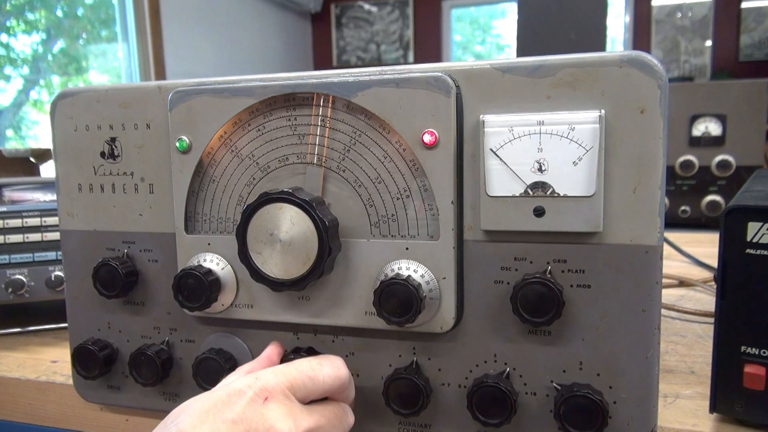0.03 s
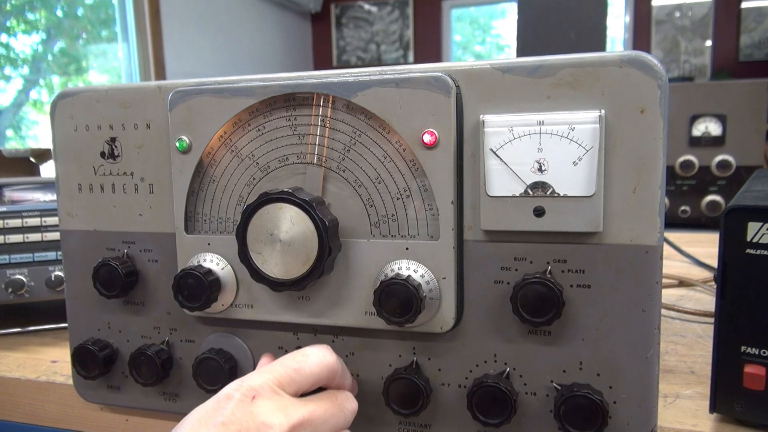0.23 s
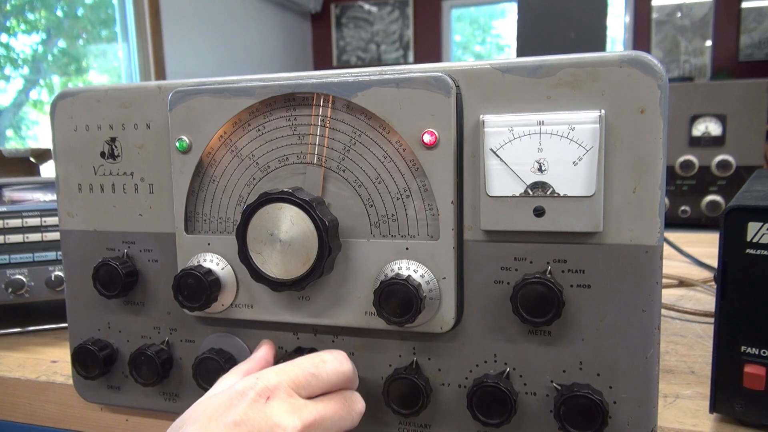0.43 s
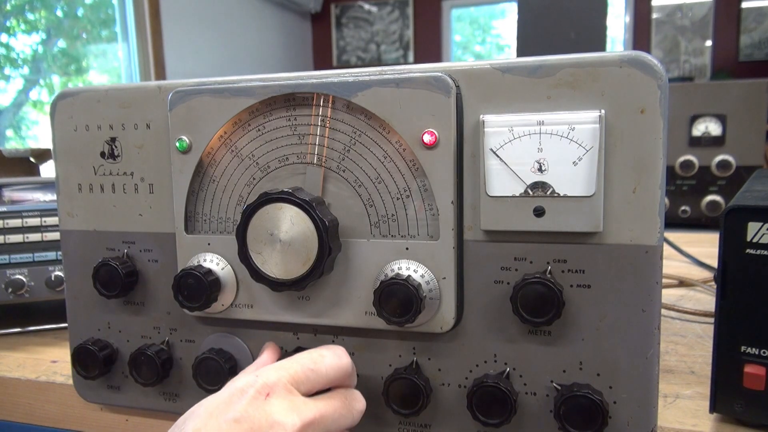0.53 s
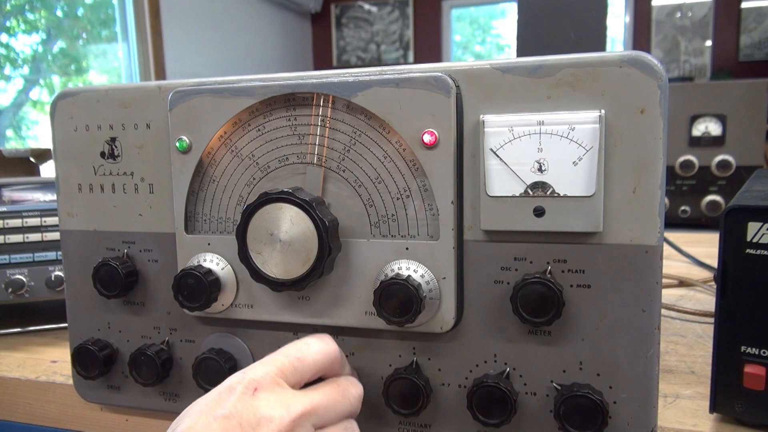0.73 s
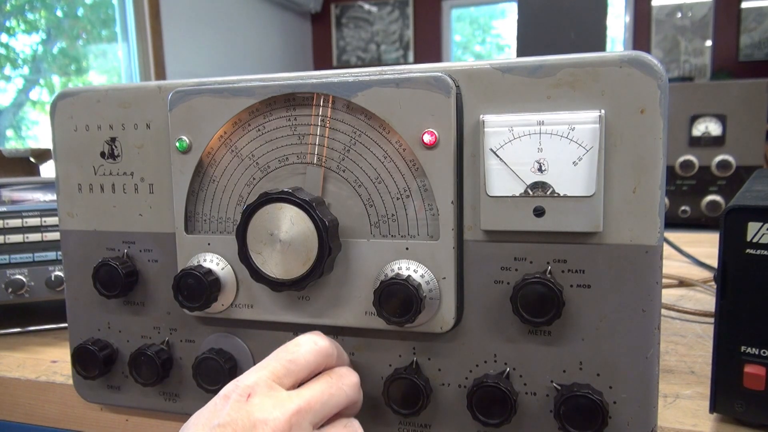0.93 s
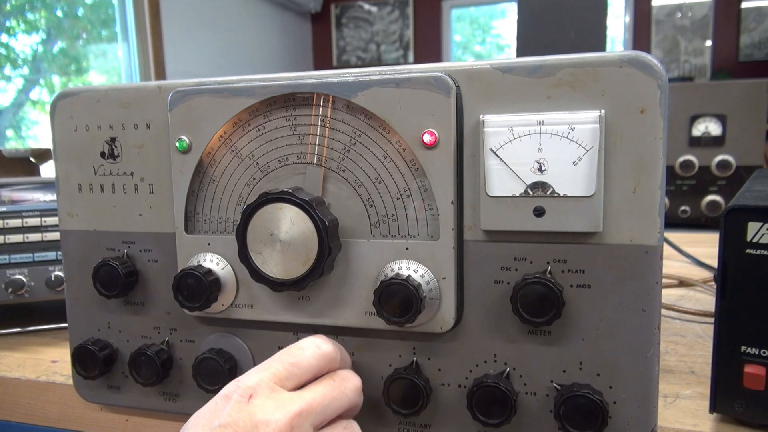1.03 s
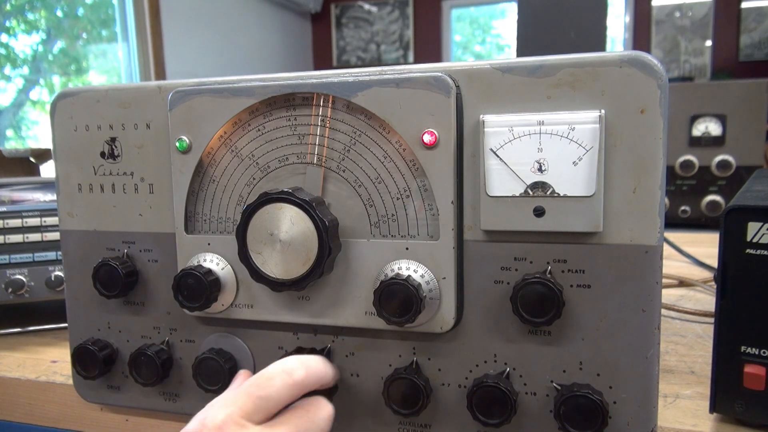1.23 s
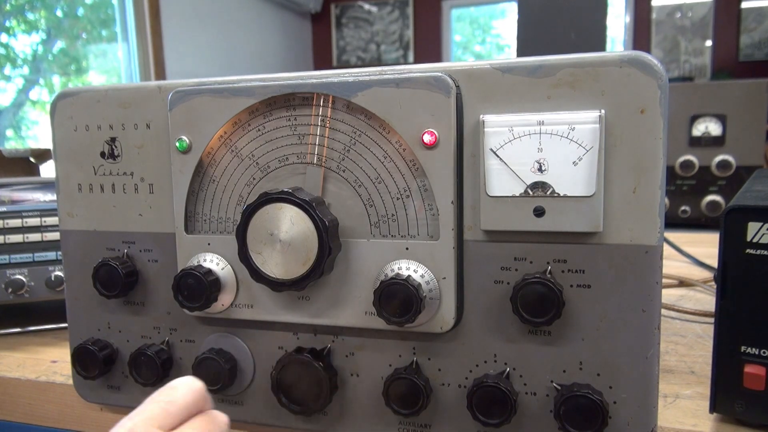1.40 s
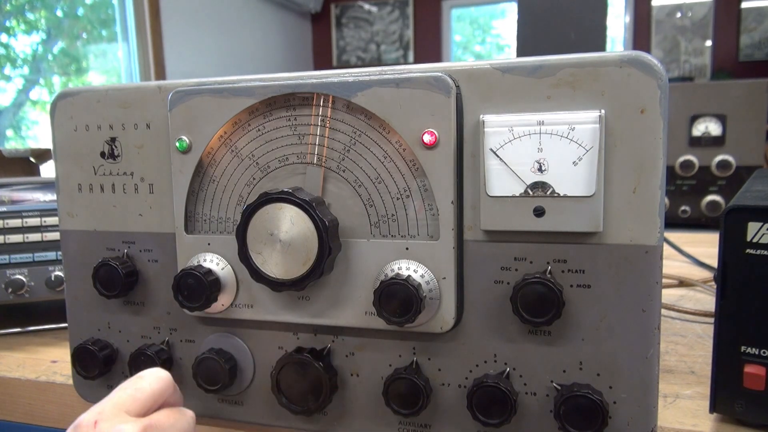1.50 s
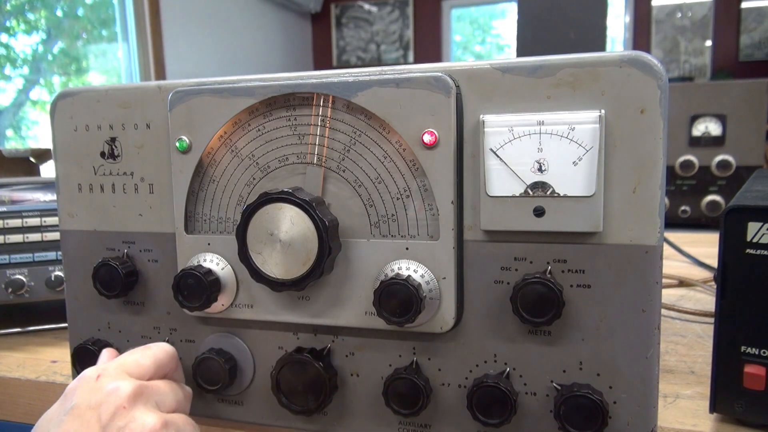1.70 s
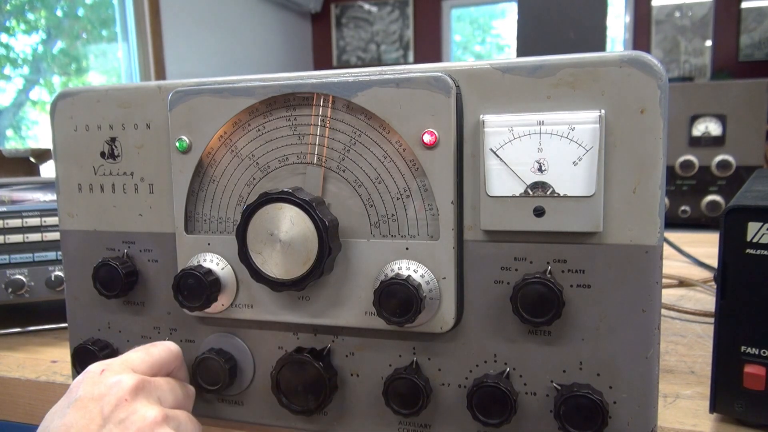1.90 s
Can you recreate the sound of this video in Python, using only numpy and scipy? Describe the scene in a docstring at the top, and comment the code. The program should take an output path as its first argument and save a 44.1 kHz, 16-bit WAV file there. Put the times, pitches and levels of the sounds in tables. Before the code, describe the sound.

A stiff selector knob snaps through two positions, its metal case ringing briefly above a low hum

```python
"""Close to a stereo pair of microphones, a rotary switch on a steel radio cabinet turns through two detents.
A low hum, room drones and soft hiss lie underneath from the start. At 0.19 s a soft lead-in begins, the
spring snaps the shaft home and the cabinet rings into a small room; hum and hiss then sink. A faint tick
at 0.58 s precedes the second snap at 0.83 s and a last tick at 0.94 s; hum and hiss grow toward the end.
Blows are shaped noise, the cabinet and hum are sines, the drones and hiss are filtered noise."""
import sys
import numpy as np
from scipy import signal
from scipy.fft import rfft, irfft
from scipy.io import wavfile

SR = 44100
rng = np.random.default_rng(int(sys.argv[2]) if len(sys.argv) > 2 else 0)


def unload_wav(signal):
    """Save mono or channel-first audio to the path in sys.argv[1] as 16-bit WAV at rate SR, clipped to [-1, 1]."""
    wavfile.write(
        sys.argv[1],
        SR,
        np.round(np.clip(np.atleast_2d(signal).T, -1, 1) * 32767).astype(np.int16),
    )


N = 85995
T = np.arange(N) / SR  # s
HZ = np.fft.rfftfreq(N, 1 / SR)

# the shaft lands in a detent: (time [s], ring level [dB], ring build-up [s], time until the shaft settles [s])
DETENTS = [(0.2226, 3, 0.00053, 0.028), (.8320, 2.5, 0.0012, 0.025)]
# level of the hum, which the drones partly follow: (time [s], level [dB])
HUM_LEVEL = [(0, -33), (.18, -30.5), (.3, -38.5), (.5, -35.5), (.8, -40.5), (1.05, -38.5), (1.3, -34.5),
             (1.6, -32.5), (1.92, -31)]


def amp(db):
    """Decibels to gain."""
    return 10 ** (np.asarray(db) / 20)


def unit(x):
    """Scales to rms 1."""
    return x / np.sqrt(np.mean(x ** 2) + 1e-20)


def read(points, hz):
    """Reads a table on a log-frequency axis."""
    f, value = np.transpose(points)
    return np.interp(np.log(hz + 1), np.log(f + 1), value)


def curve(points):
    """Reads a table over time."""
    return np.interp(T, *np.transpose(points))


def add(mix, s, sound):
    """Mixes a stereo sound in at time s."""
    part = mix[:, round(s * SR):][:, :sound.shape[1]]
    part += sound[:, :part.shape[1]]


def noise(size, gain, likeness):
    """Stereo noise with a given spectrum; mid and side weights set the left-right likeness."""
    hz = np.fft.rfftfreq(size, 1 / SR)
    mid, side = np.exp(2j * np.pi * rng.random((2, len(hz))))
    same = np.clip(read(likeness, hz), -1, 1)
    mid = mid * np.sqrt(1 + same)
    side = side * np.sqrt(1 - same)
    return unit(irfft(np.array([mid + side, mid - side]) * gain(hz), size))


def narrow(hz, width):
    """Noise through one steep resonance, 12 dB down at one width from its centre."""
    resonance = 1 / (1 + ((HZ - hz) / width) ** 2) ** 2
    return unit(irfft(np.exp(2j * np.pi * rng.random(len(HZ))) * resonance, N))


def fade(x, t60s, hold=0):
    """After a hold, lets every band die at its own speed."""
    hz, t, bands = signal.stft(x, SR, nperseg=128)
    t60 = np.maximum(read(t60s, hz), 1e-3)[:, None]
    loss_db = 60 * np.maximum(t - hold, 0) / t60
    return signal.istft(bands * amp(-loss_db), SR, nperseg=128)[1][:, :x.shape[1]]


def blow(start, db, tilt_db, rise, length):
    """Metal meets metal: a brief crack and a dense, quickly dying ring, coloured by the nearest detent."""
    # dense ring of shaft, wafers and panel:
    # (frequency [Hz], spectrum at the first detent [dB per Hz], at the second [dB per Hz])
    clack_spectrum = [(70, -38, -36), (164, -11, -6.5), (272, -9, -7.5), (650, -1.5, -1.5),
                      (1296, -8.5, -5.5), (1726, 4, 4), (2040, -9.5, -8.5), (3200, -6.5, -2.5),
                      (5140, -9.5, -7.5), (8140, -11.5, -14.5), (10550, -25.5, -27), (12000, -19, -22),
                      (14000, -54, -72)]
    # decay of that ring: (frequency [Hz], t60 [s])
    clack_t60 = [(200, 0.053), (1500, 0.093), (5000, 0.1), (12000, 0.12)]
    # left-right likeness of that ring: (frequency [Hz], likeness [-1 to 1])
    clack_likeness = [(200, 1), (600, 0.98), (1500, 0.85), (5000, 0.88), (12000, 0.75)]
    ring_share = 0.37  # share of the gain that stays after the crack

    detent = np.argmin([abs(start - s) for s, *_ in DETENTS])
    colour = [(hz, dbs[detent]) for hz, *dbs in clack_spectrum]

    def spectrum(hz):
        """The detent's colour, tilted around 2 kHz; below 500 Hz the tilt stays constant."""
        tilt = tilt_db * np.log2(np.maximum(hz, 500) / 2000)
        return amp(read(colour, hz) + tilt)

    ring = noise(size=8192, gain=spectrum, likeness=clack_likeness)
    t = np.arange(ring.shape[1]) / SR
    attack = np.minimum(t / rise, 1)
    crack = ring_share + (1 - ring_share) * np.exp(-(t / length) ** 2)
    return amp(db) * attack * crack * fade(ring, clack_t60, hold=rise)


def switch_blows():
    """The soft lead-ins, blows and ticks of the switch, each one a burst of dense noise."""
    # (time [s], level [dB], tilt [dB per octave], rise [s], crack length [s])
    blows = [(0.194, -31.5, -4.5, 0.016, 0.037), (0.2119, -22, -3, 0.0004, 0.0084),
             (0.2201, -17.5, -1.5, 0.00074, 0.009), (0.2231, -7.5, -1.84, 0.00031, 0.0049),
             (0.2288, -16, 0, 0.00049, 0.0042), (0.2372, -18.5, -3.5, 0.0015, 0.0026),
             (0.58, -43, 1.5, 0.0033, 0.0049), (0.816, -33, -3.5, 0.0056, 0.015),
             (0.826, -15, -0.5, 0.00082, 0.009), (.8325, -16, 4.5, 0.0016, 0.0037),
             (0.8354, -16.5, -3, 0.0013, 0.017), (0.941, -37.5, -0.5, 0.0015, 0.015)]
    clacks = np.zeros((2, N))
    for row in blows:
        add(clacks, row[0], blow(*row))
    return clacks


def cabinet():
    """Each detent sets the steel panels swinging: strongly while the shaft chatters, then ringing freely."""
    # cabinet modes, one column per mode: pitch [Hz]
    mode_hz = [152, 286, 388, 497, 516, 642, 680, 823, 936, 1078, 1198, 1339, 1466, 1592, 1613, 1712, 1790,
               2016, 3088]
    # one row per detent, one column per mode: level before the detent's own level [dB]
    mode_db = [
        [-13, -7.5, -17, -17, -36, -20, -24, -17, -24, -34, -31, -25, -23, -21, -36, -21, -20, -40, -34],
        [-29, -26, -32, -36, -23, -24, -26, -23, -35, -25, -23, -36, -28, -17, -18.5, -24, -35, -23, -22.5],
    ]
    # one column per mode: t60 [s]
    mode_t60 = [.3, .2, .25, .24, .28, .22, .22, .28, .22, .27, .23, .2, .18, .16, .26, .2, .17, .34, .26]
    spread = 0.33  # typical phase shift at either microphone from 1 kHz up, opposite in sign [rad]
    settled_share = 0.31  # part of the swing that is left once the shaft has settled
    # a mode at swing_hz takes swing_s longer to swing up; higher ones are far quicker
    swing_s, swing_hz = 0.023, 305

    out, t = np.zeros((2, N)), T[:SR]
    for (start, level_db, build, settle), levels in zip(DETENTS, mode_db):
        ring = np.zeros((2, SR))
        skews = rng.standard_normal(len(mode_hz))
        for hz, db, t60, skew in zip(mode_hz, levels, mode_t60, skews):
            phase = spread * skew * min(hz / 1000, 1) * np.array([[1], [-1]])
            swing_up = build + swing_s * (swing_hz / hz) ** 1.83
            swell = 1 - np.exp(-(t / swing_up) ** 2)
            decay = np.exp(-np.log(1000) * t / t60)
            ring += amp(db) * swell * decay * np.sin(2 * np.pi * hz * t + phase)
        chatter = np.exp(-(t / settle) ** 6)
        add(out, start, amp(level_db) * ring * (settled_share + (1 - settled_share) * chatter))
    return out


def room(x):
    """A short diffuse tail from bench and walls: decaying noise convolved with the mono sum."""
    # decay of the room: (frequency [Hz], t60 [s])
    room_t60 = [(120, 0.72), (500, 0.39), (1500, 0.28), (4000, 0.26), (8000, 0.25), (13000, 0.24)]
    # left-right likeness of the tail: (frequency [Hz], likeness [-1 to 1])
    room_likeness = [(150, 1), (500, 0.94), (1500, 0.24), (6000, 0.54), (11000, 0.65)]
    delay_s = 0.0092  # middle of the tail's fade-in, which lasts as long again

    tail = fade(noise(size=32768, gain=np.ones_like, likeness=room_likeness), room_t60)
    tail = tail * np.clip(T[:tail.shape[1]] / delay_s - .5, 0, 1)
    return signal.fftconvolve(x.mean(0)[None], tail / np.linalg.norm(tail[0]), axes=1)[:, :N]


def switch_in_room():
    """Blows and cabinet, direct and through the room, with little bass and a left-right balance."""
    # balance between the microphones: (frequency [Hz], left minus right [dB])
    balance = [(200, -1.5), (500, 0.5), (1000, -0.5), (2000, 0.5), (4000, 1.3), (10000, -0.2)]
    clack_send_db, ring_send_db = -4, -12.5  # levels into the room
    low_cut_hz = 93  # below this the switch and its room tail are cut

    clacks, ring = switch_blows(), cabinet()
    switch = clacks + ring + room(amp(clack_send_db) * clacks + amp(ring_send_db) * ring)
    low_cut = signal.butter(2, low_cut_hz, "highpass", fs=SR, output="sos")
    switch = signal.sosfilt(low_cut, switch)
    return irfft(rfft(switch) * amp(read(balance, HZ) * np.array([[.5], [-.5]])), N)


def hum():
    """A machine hum: harmonic sines on a drifting pitch, each wavering slowly in level."""
    # pitch of the hum: (time [s], pitch [Hz])
    pitch = [(0, 99), (.5, 102.5), (1.0, 100.0), (1.45, 100.5), (1.7, 104.5), (1.95, 102.5)]
    # (multiple of the pitch, level before the hum's own level [dB], rms waver [share of the level])
    partials = [(1, -3.5, 0.033), (2, -19.5, 0.96), (3, -22, 0.27)]
    turns = np.cumsum(curve(pitch)) / SR
    tone = np.zeros(N)
    for multiple, db, waver in partials:
        level = amp(db) * (1 + waver * narrow(0, 5))
        tone += level * np.sqrt(2) * np.sin(2 * np.pi * round(multiple) * turns)
    return amp(curve(HUM_LEVEL)) * tone


def drones():
    """Room resonances that drone: narrow noise bands that partly follow the level of the hum."""
    # (frequency [Hz], width [Hz], level at the mean hum level [dB])
    resonances = [(26.3, 1.6, -59.5), (53.35, 1.6, -63), (135, 18, -53.5), (154.5, 4.8, -52.5),
                  (302, 13, -53.5), (690, 2.1, -74.5), (834.4, 5.5, -64)]
    follow = 0.45  # dB of drone per dB of hum
    level_db = curve(HUM_LEVEL)
    bands = sum(amp(db) * narrow(hz, width) for hz, width, db in resonances)
    return amp(follow * (level_db - level_db.mean())) * bands


def hiss():
    """Soft air noise of the room: broad stereo noise, strongest in the lows, on a slow level curve."""
    # spectrum before levelling: (frequency [Hz], level [dB per Hz])
    hiss_spectrum = [(20, -55), (65, -20), (110, -30.5), (200, -15.5), (330, -16), (450, -22), (800, -24.5),
                     (1600, -26.5), (3000, -30.5), (6000, -37), (10000, -44), (15800, -47.5)]
    # (time [s], level [dB])
    hiss_level = [(0, -41.5), (.2, -41.5), (.5, -48), (.8, -46.5), (1.2, -46.5), (1.9, -44.5)]
    # left-right likeness: (frequency [Hz], likeness [-1 to 1])
    hiss_likeness = [(60, 0.96), (180, 1.0), (550, 0.84), (1650, 0.34), (4970, 0.53), (15000, 1)]
    air = noise(size=N, gain=lambda hz: amp(read(hiss_spectrum, hz)), likeness=hiss_likeness)
    return amp(curve(hiss_level)) * air


def scene():
    """Switch and cabinet in the room, over hum, drones and hiss."""
    return switch_in_room() + hum() + drones() + hiss()


def record(dry):
    """Full-scale clipping, then a steep low-pass as the band limit."""
    edge_hz = 15900
    low_pass = signal.firwin(511, edge_hz, window=("kaiser", 9), fs=SR)
    return signal.oaconvolve(np.clip(dry, -1, 1), low_pass[None], "same")


dry = scene()
out = record(dry)
unload_wav(out)
```